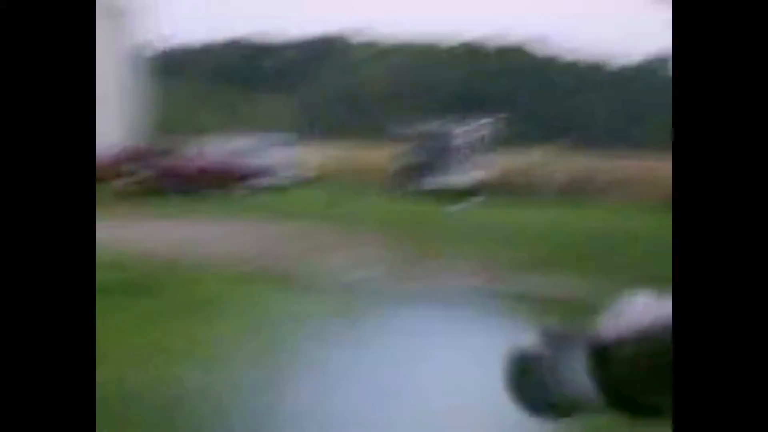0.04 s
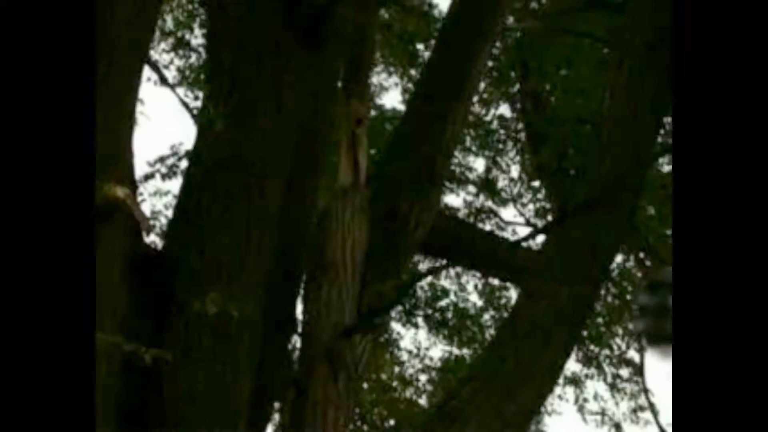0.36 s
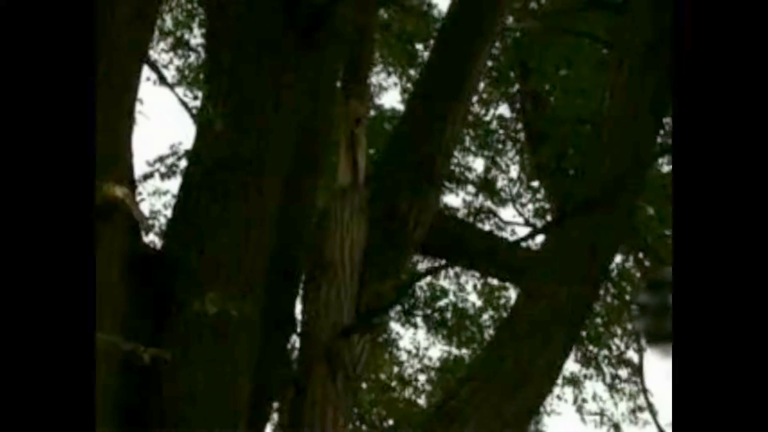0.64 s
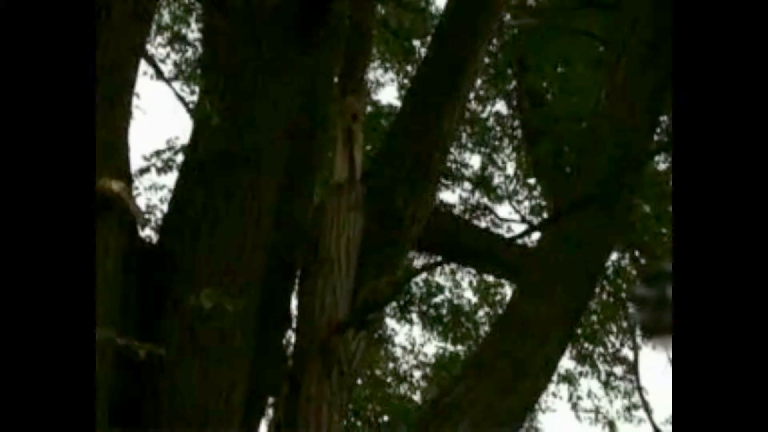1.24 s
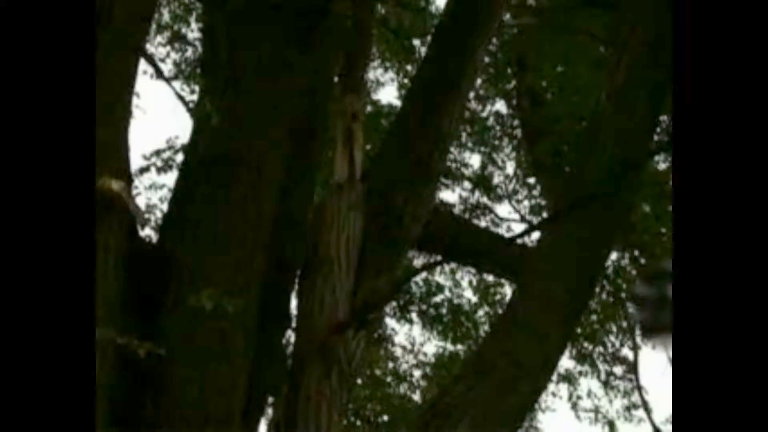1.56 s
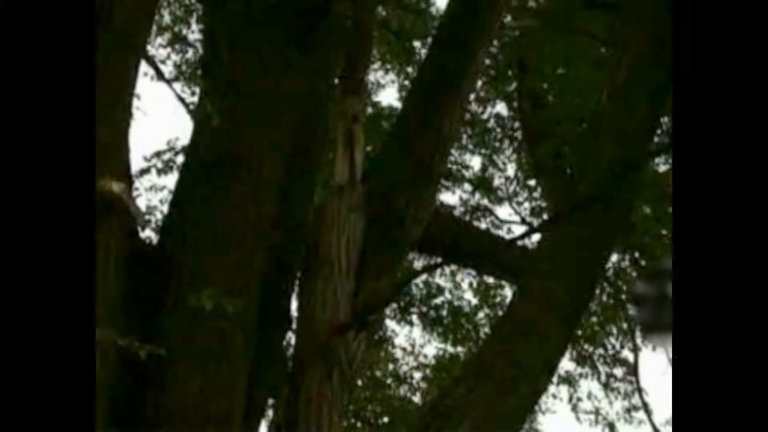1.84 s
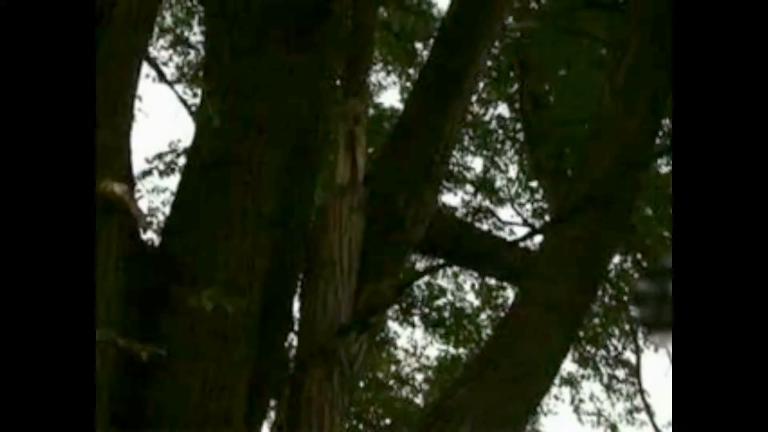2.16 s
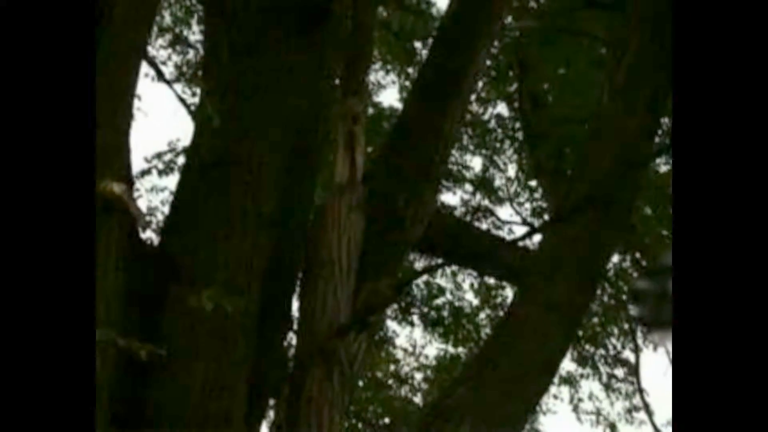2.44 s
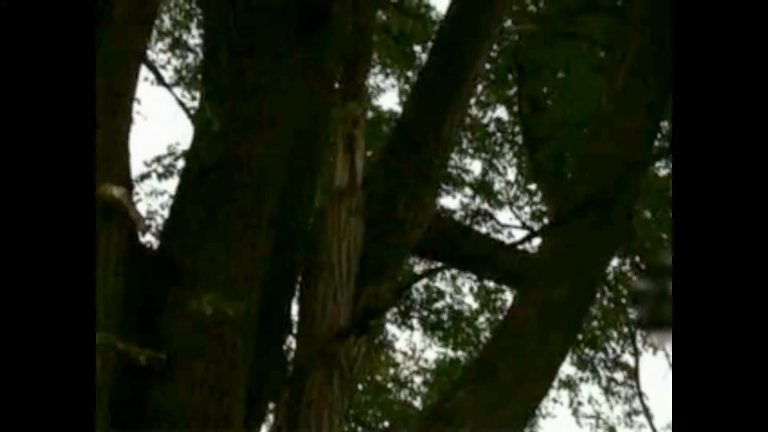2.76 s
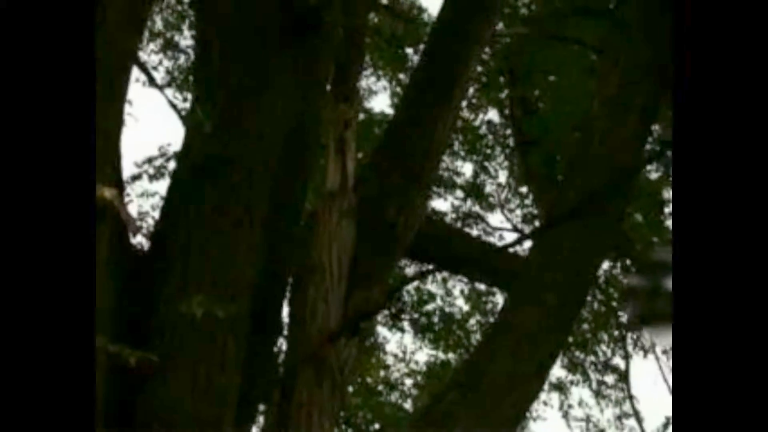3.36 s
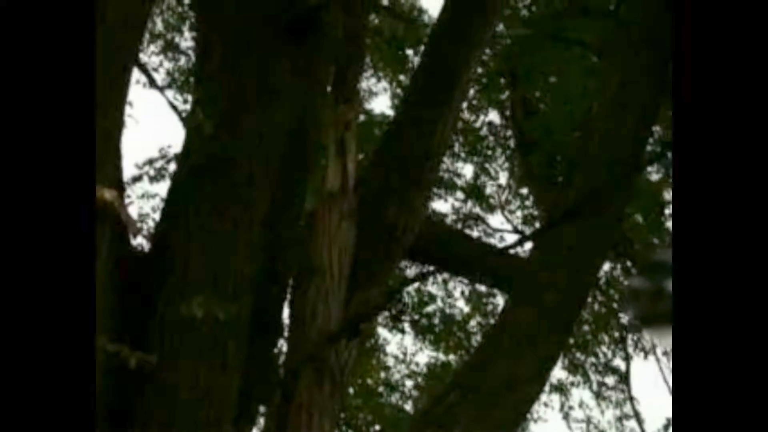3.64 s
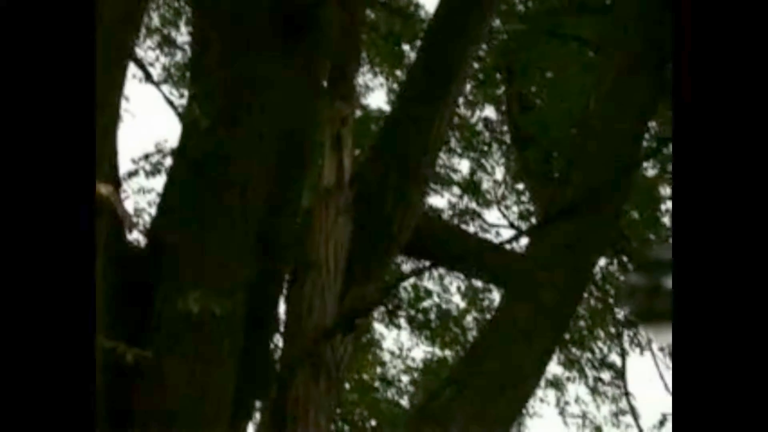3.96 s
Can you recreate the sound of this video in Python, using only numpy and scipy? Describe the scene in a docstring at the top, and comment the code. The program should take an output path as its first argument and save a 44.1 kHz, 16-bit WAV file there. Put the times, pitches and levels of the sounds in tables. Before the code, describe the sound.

A faint, steady rumble and hiss of still air among trees begins after a small camera clicks close to the microphone and the sound briefly cuts out. A thin whine runs throughout, turning raspy briefly, while leaves barely stir.

```python
"""A small camera is handled: its case clicks, and the sound drops out for an instant.
A soft pop opens onto still air under trees: a faint low rumble over a slow sway, and a dull hiss.
Thin steady whines, probably the camera's own, sit on top, and leaves stir lightly twice.
Just past halfway the highest whine breaks into a rasp for half a second, then comes back.
The leaves stir once more near the end."""
import sys
import numpy as np
from scipy.fft import rfft, irfft, next_fast_len
from scipy.io import wavfile
from scipy.ndimage import map_coordinates

SR = 44100
rng = np.random.default_rng(int(sys.argv[2]) if len(sys.argv) > 2 else 0)


def unload_wav(signal):
    """Save mono or channel-first audio to the path in sys.argv[1] as 16-bit WAV at rate SR, clipped to [-1, 1]."""
    wavfile.write(
        sys.argv[1],
        SR,
        np.round(np.clip(np.atleast_2d(signal).T, -1, 1) * 32767).astype(np.int16),
    )


N = 176400
T = np.arange(N) / SR
DROPOUT_S, RESUME_S = .0408, .1153

# tone colour of the sub-bass sway, the rumble and the hiss (f/Hz, relative level/dB)
SWAY_SPECTRUM = [(1, -18.5), (4, -15.5), (8.5, -5), (13, -9.5), (19, -13), (24, -34), (28, -42),
                 (40, -58.5), (80, -120)]
RUMBLE_SPECTRUM = [(15, -4), (28, 4), (36, -3), (65, 4), (120, 1.5), (160, -1.5), (210, -7.5), (300, -17.5),
                   (600, -68.5)]
HISS_SPECTRUM = [(100, -4.5), (300, 0.5), (560, 0.5), (690, 2.5), (800, 0), (1000, 0), (1200, -0.5),
                 (1500, -1), (1750, 0.5), (2030, -1.5), (2120, 0.5), (2210, 3.5), (2270, -5.5), (2400, -14),
                 (2560, -30), (2700, -64.5), (3000, -120)]
# slow level rides on the rumble and the hiss (t/s, relative level/dB)
RUMBLE_RIDE = [(.15, 1.5), (1.0, -0.5), (1.55, 2.5), (2.1, -1), (2.9, -1.5), (3.3, 1.5), (3.95, -1)]
HISS_RIDE = [(.15, -1), (.55, -0.5), (.9, -.5), (1.5, 0.3), (1.9, 0), (2.5, -.5), (3.0, -1.5), (3.4, 0.76),
             (3.95, -0.5)]
# stereo image of the hiss (f/Hz, left-right correlation/0-1)
HISS_CORRELATION = [(1050, 1), (1090, .25), (1580, 0.2), (1680, 1), (1770, .3), (2300, 0.5)]
# the unbroken whines (f/Hz, level/dB)
STEADY_WHINES = [(112.5, -61.5), (1642, -63.5), (1884, -79)]
# handling clicks: three sharp ones, then a faint tick as the sound drops out
# (t/s, relative ring level/dB, relative snap level/dB, snap t60/s)
HANDLING_CLICKS = [(.0096, -27, -27, 0.016), (0.0123, -43.5, -30.5, 0.0069), (0.0282, -45.5, -31.5, 0.014),
                   (0.054, -61, -29, 0.04)]
# resonances of the camera's case (f/Hz, relative level/dB, t60/s)
CASE_MODES = [(668, -6, 0.049), (800, -6.5, 0.033), (915, 1, .045), (1133.5, 1, .016), (1311.6, -8, .015),
              (1974, -1, 0.017), (2350, 0.5, 0.013)]
# tone colour of the snap and of the air around the clicks (f/Hz, relative level/dB)
SNAP_SPECTRUM = [(300, -36), (900, -3.5), (1500, 1), (2200, 2), (3500, 0.5), (6000, -0.5), (8200, -2.5),
                 (9500, -18.5), (11000, -50), (13000, -89.5)]
OPENING_AIR_SPECTRUM = [(30, -1), (250, -8.5), (570, -11.5), (670, 1.5), (930, -1), (1300, -11.5),
                        (2100, -13), (3500, -19.5), (8500, -26.5), (10500, -52.5), (12000, -91)]
# stereo width of the snap (f/Hz, side gain/dB)
SNAP_WIDTH = [(600, -50.5), (2000, -28.5), (4000, -10), (8000, 1)]
# stirs of the leaves (peak t/s, length/s, level/dB)
LEAF_STIRS = [(0.584, 0.21, -63.5), (1.466, 0.29, -61.5), (3.799, 0.2, -66)]


def low_air(sway_db=-29, rumble_db=-52.5):
    """The low bed: a slow pressure sway under a distant rumble, dead centre."""
    ride_db = np.interp(T, *np.transpose(RUMBLE_RIDE)) + 0.58 * wobble(8)
    sway = amp(sway_db) * coloured(SWAY_SPECTRUM)
    rumble = amp(rumble_db + ride_db) * coloured(RUMBLE_SPECTRUM)
    return sway + rumble


def hiss(level_db=-55.5):
    """Dull outdoor hiss, centred in the lows and wider above, swelling a little."""
    spread = lambda hz: np.arccos(np.clip(along(HISS_CORRELATION, hz), -1, 1)) / 2
    mid = filtered(coloured(HISS_SPECTRUM), lambda hz: np.cos(spread(hz)))
    side = filtered(coloured(HISS_SPECTRUM), lambda hz: np.sin(spread(hz)))
    ride_db = np.interp(T, *np.transpose(HISS_RIDE)) + 0.59 * wobble(7)
    return amp(level_db + ride_db) * unit(np.array([mid + side, mid - side]))


def whine(hz, db, drift_hz=1.1, flutter_db=1.0):
    """One thin sine, slightly unsteady in pitch and level."""
    phase = 2 * np.pi * np.cumsum(hz + drift_hz * wobble(12)) / SR
    return amp(db + flutter_db * wobble(20)) * np.sqrt(2) * np.sin(phase)


def whines(break_s=2.23, mend_s=2.75, fade_s=0.037, duck_db=18):
    """Whines, probably the camera's; the highest ducks briefly under a slightly lower rasp."""
    broken = np.clip(np.minimum(T - break_s, mend_s - T) / fade_s + .5, 0, 1)
    rasp = amp(-60.5) * band_noise(centre_hz=2123, width_hz=45)
    highest = whine(hz=2228.7, db=-57 - duck_db * broken)
    return sum(whine(hz, db) for hz, db in STEADY_WHINES) + highest + broken * rasp


def handling(air_db=-42.5, drop_db=27.5, fade_db_per_s=350.5):
    """Quick clicks over louder air, each a noisy snap and a ring of the case; all drop away together."""
    out = amp(air_db) * coloured(OPENING_AIR_SPECTRUM)
    for onset, ring_db, snap_db, snap_t60 in HANDLING_CLICKS:
        age = np.maximum(T - onset, 0)
        ring = sum(amp(ring_db + db - 60 * age / t60) * np.sin(2 * np.pi * hz * age)
                   for hz, db, t60 in CASE_MODES)
        mid = coloured(SNAP_SPECTRUM)
        side = filtered(coloured(SNAP_SPECTRUM), lambda hz: amp(along(SNAP_WIDTH, hz)))
        snap = amp(snap_db - 60 * age / snap_t60) * np.array([mid + side, mid - side])
        attack = 1 - np.exp(-age / .0002)
        out = out + attack * (ring + snap)
    dropout_db = np.where(T > DROPOUT_S, -drop_db - fade_db_per_s * (T - DROPOUT_S), 0)
    return low_pass(amp(dropout_db) * out, top_hz=10300)


def pop(peak_db=-27.5, settle_s=0.016):
    """The sound comes back with a step that settles at once: a soft, dull pop."""
    progress = np.maximum(T - RESUME_S, 0) / settle_s
    return amp(peak_db) * (1 - progress ** 2) * np.exp(-progress ** 2 / 2)


def leaves():
    """Leaves stir far back in the mix: soft, wide swells of narrow-band noise."""
    swell = sum(amp(db) * np.exp(-(2 * (T - peak) / length) ** 2) for peak, length, db in LEAF_STIRS)
    return swell * np.array([band_noise(centre_hz=1880, width_hz=100) for _ in range(2)])


def amp(db):
    """Decibels to gain."""
    return 10 ** (np.asarray(db) / 20)


def unit(x):
    """Scale to rms 1."""
    return x / np.sqrt(np.mean(x ** 2) + 1e-20)


def along(points, hz):
    """Read a curve of (f/Hz, value) points on a log frequency axis."""
    freqs, values = np.transpose(points)
    return np.interp(np.log(hz + 1), np.log(freqs + 1), values)


def wobble(rate):
    """Smooth random modulation, with rate points a second."""
    return map_coordinates(rng.standard_normal(int(N * rate / SR) + 4), [T * rate])


def filtered(x, response):
    """EQ x with a gain that depends on frequency."""
    size = next_fast_len(N + SR // 2)
    return irfft(rfft(x, size) * response(np.fft.rfftfreq(size, 1 / SR)), size)[..., :N]


def low_pass(x, top_hz):
    """A steep roll-off of the top end."""
    return filtered(x, lambda hz: 1 / np.sqrt(1 + (hz / top_hz) ** 48))


def noise(response):
    """White noise through an EQ, at rms 1."""
    white = rng.standard_normal(next_fast_len(N + SR // 2))
    return unit(filtered(white, response))


def coloured(spectrum):
    """Noise of rms 1 with a (f/Hz, level/dB) spectrum."""
    return noise(lambda hz: amp(along(spectrum, hz)))


def band_noise(centre_hz, width_hz):
    """Noise of rms 1 in a bell-shaped band."""
    return noise(lambda hz: np.exp(-.5 * ((hz - centre_hz) / width_hz) ** 2))


def scene():
    """The clicks, a beat of silence, then the quiet under the trees."""
    ambience = pop() + low_air() + hiss() + leaves() + whines()
    return np.where(T < RESUME_S, handling(), ambience)


def record(dry):
    """The camera's band limit shaves off the very top."""
    return low_pass(dry, top_hz=16500)


dry = scene()
out = record(dry)
unload_wav(out)
```